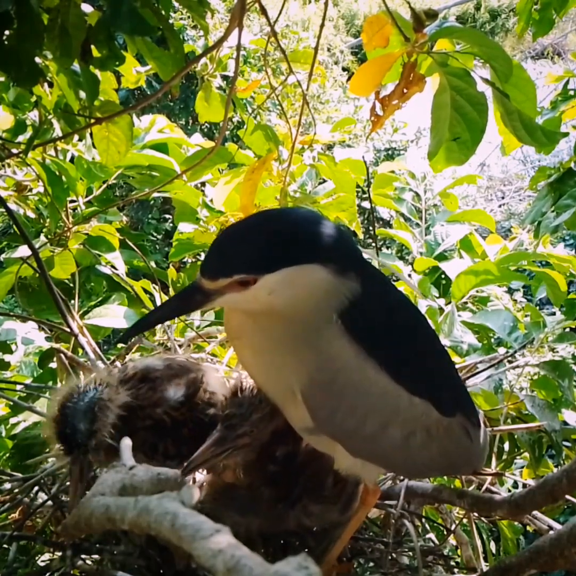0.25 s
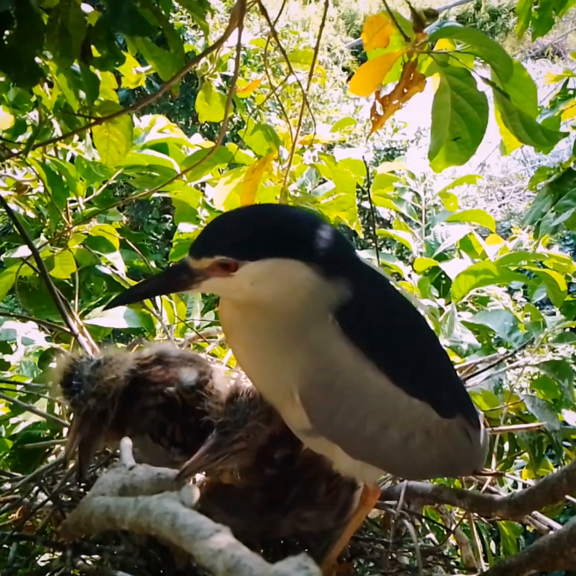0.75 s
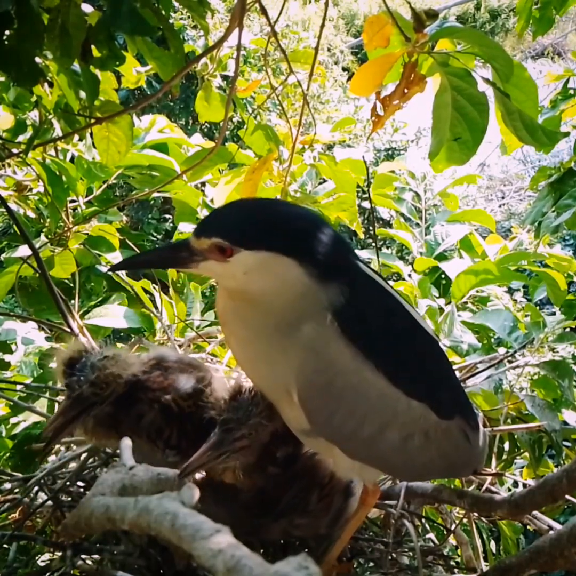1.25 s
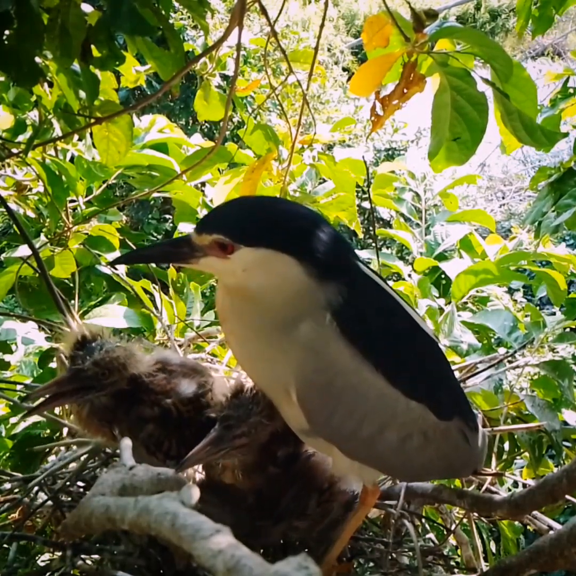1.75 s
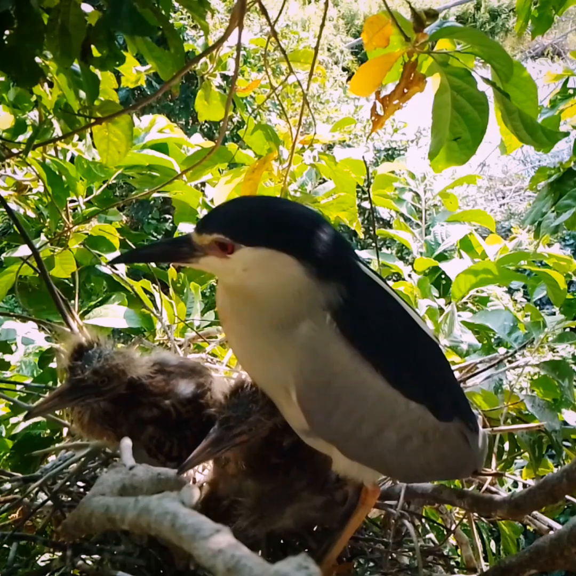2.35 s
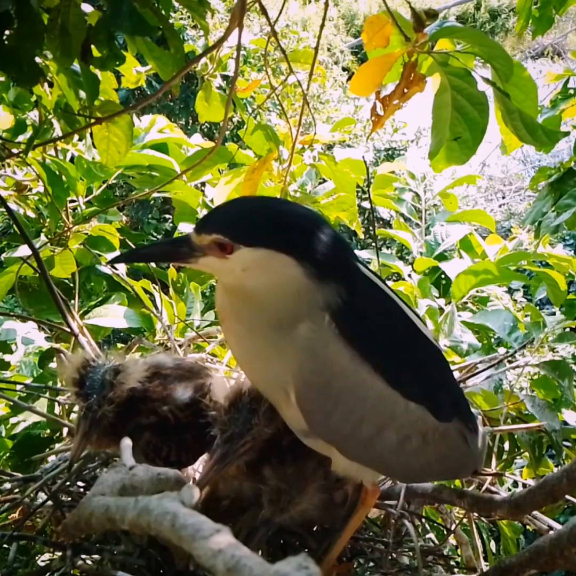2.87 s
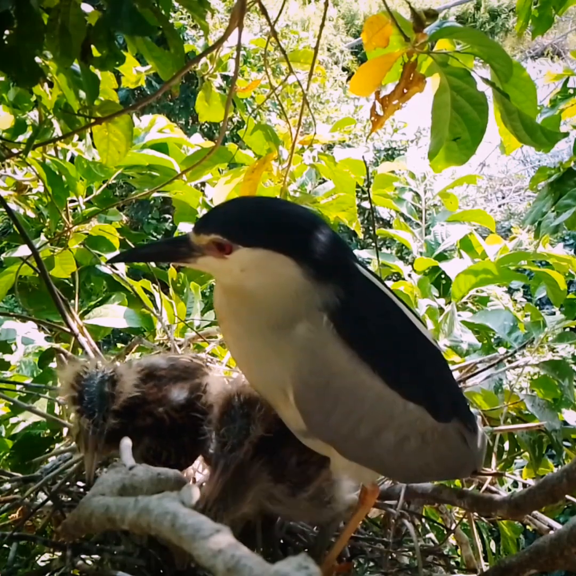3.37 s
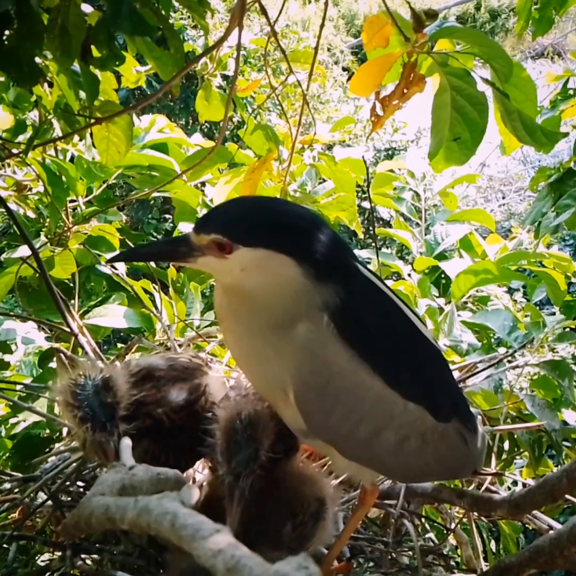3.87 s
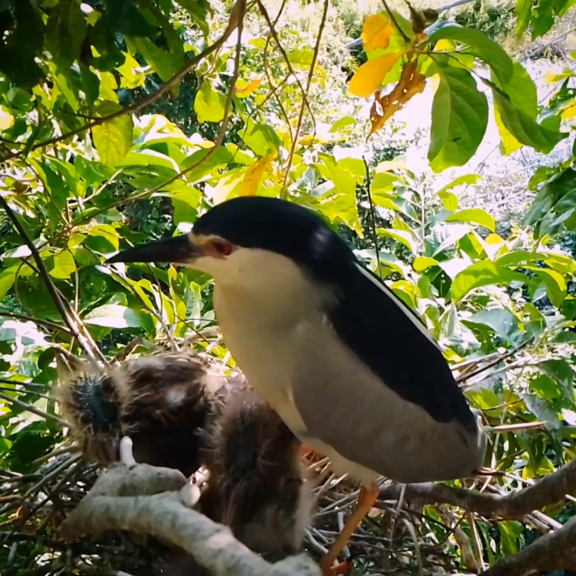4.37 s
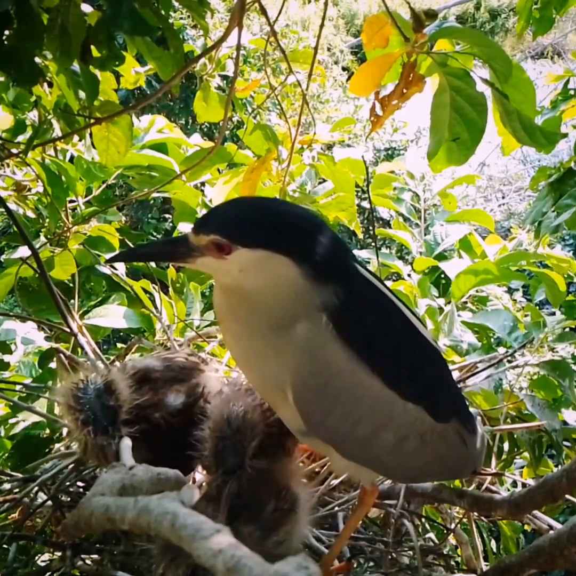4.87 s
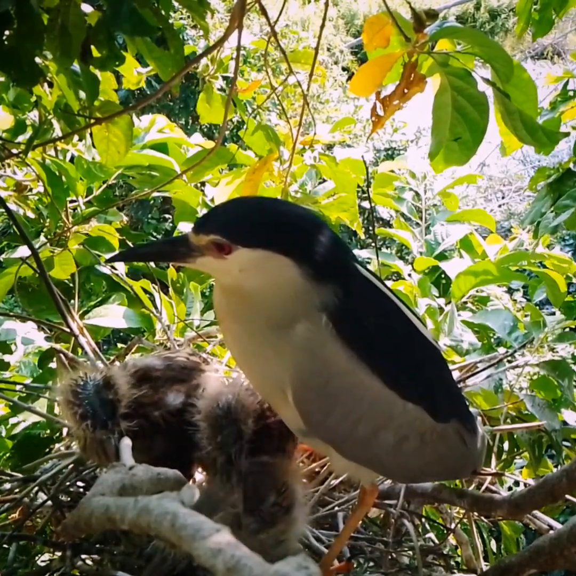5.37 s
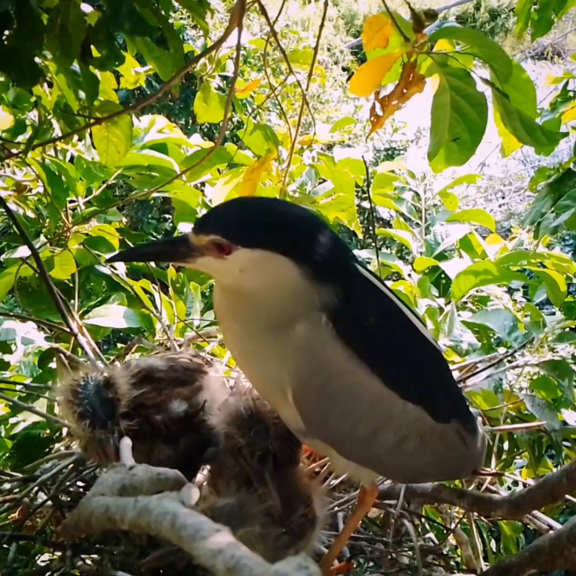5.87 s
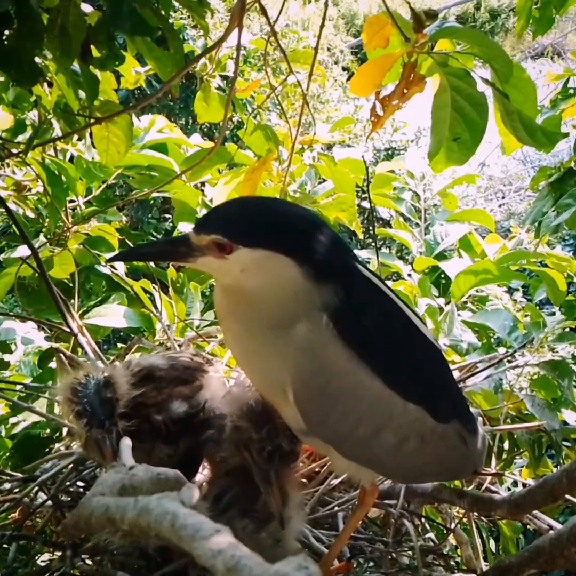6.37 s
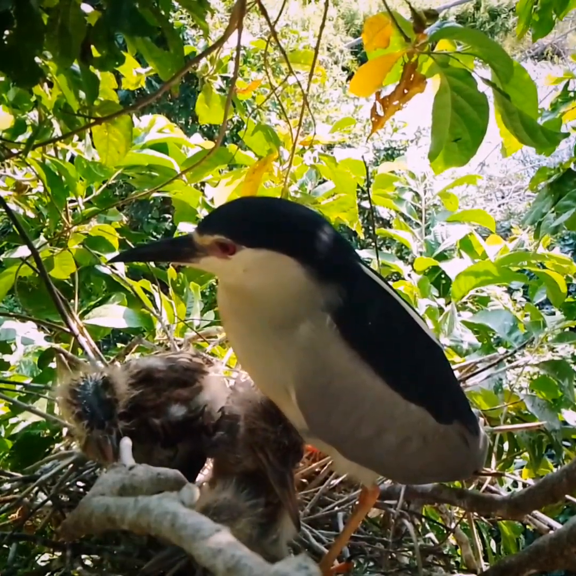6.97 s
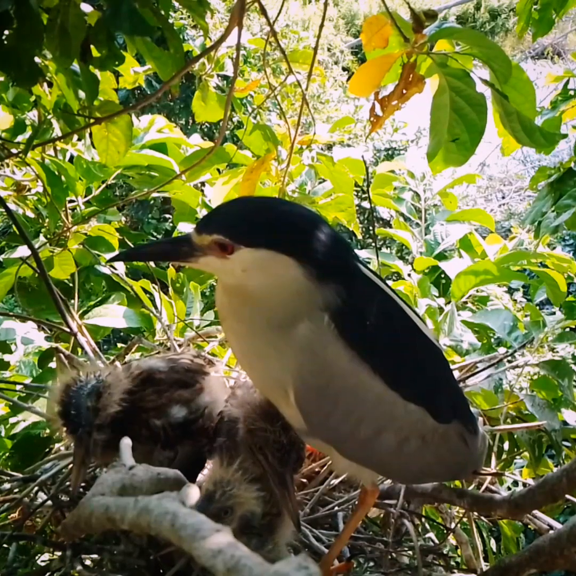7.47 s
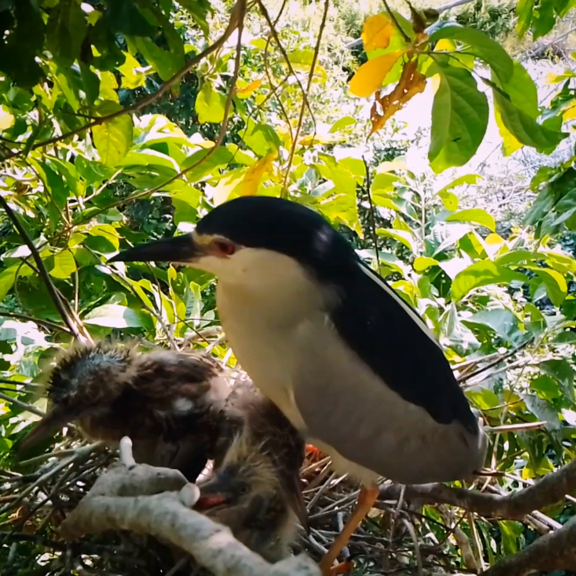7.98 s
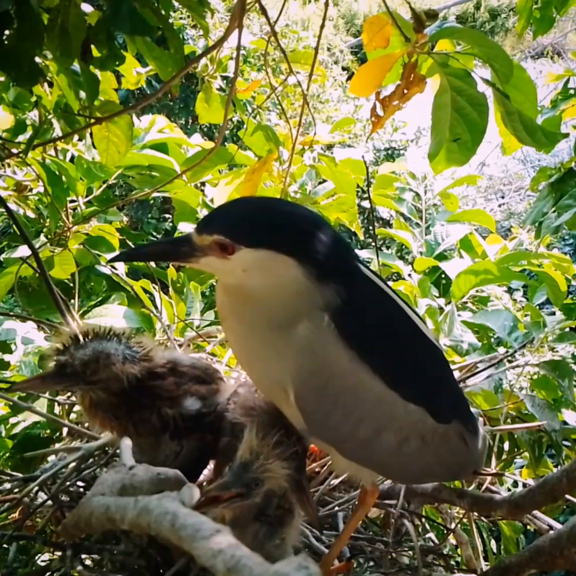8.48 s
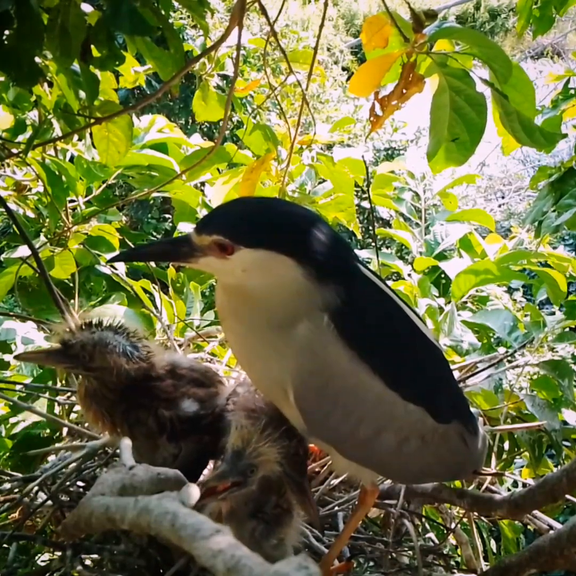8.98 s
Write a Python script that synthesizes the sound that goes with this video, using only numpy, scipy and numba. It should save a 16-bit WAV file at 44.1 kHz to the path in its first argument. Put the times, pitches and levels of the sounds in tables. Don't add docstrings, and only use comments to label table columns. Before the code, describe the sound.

Young nestlings beg in a tree. Distant ticks and a quiet croak lead to a near chick's dry, buzzy clicks, uneven at first, then regular at four or so a second. Another chick gives hoarse, breathy squawks that open up and fall; a third squeaks and cracks. A sharp twig snap, short honks and faint moans pass behind. Small spaced stereo microphones sit close, with soft hiss and leafy scatter but little echo.

```python
import sys
import numpy as np
from scipy import signal
from scipy.fft import rfft, irfft, next_fast_len
from scipy.io import wavfile
from scipy.ndimage import uniform_filter1d
from numba import njit

SR = 44100
rng = np.random.default_rng(int(sys.argv[2]) if len(sys.argv) > 2 else 0)


def attenuation_scalar(level_db):
    decades = np.asarray(level_db, float) / 20
    return 10 ** decades


def waveform_to_disk(signal):
    frames = np.transpose(np.atleast_2d(signal))
    scaled = np.clip(frames, -1, 1) * 32767
    samples = np.round(scaled).astype(np.int16)
    wavfile.write(sys.argv[1], SR, samples)


N = 407043


def rms_one(x):
    return x / np.sqrt(np.mean(x ** 2) + 1e-20)


def in_time(rows, t):
    s, *columns = np.transpose(rows)
    return [np.interp(t, s, column) for column in columns]


def at_hz(points, hz):
    points_hz, points_db = np.transpose(points)
    return np.interp(np.log(np.maximum(hz, 1)), np.log(points_hz), points_db)


def colour(x, points):
    size = next_fast_len(x.shape[-1])
    gain = attenuation_scalar(at_hz(points, np.fft.rfftfreq(size, 1 / SR)))
    return irfft(rfft(x, size) * gain, size)[..., :x.shape[-1]]


def wobble(rate_hz, size):
    r = np.exp(-2 * np.pi * rate_hz / SR)
    noise = rng.standard_normal(size + 8000)
    return rms_one(signal.lfilter([1], [1, -2 * r, r * r], noise)[8000:])


@njit
def moving_ring(x, hz, r, step):
    y = np.zeros(len(x))
    for i in range(2, len(x)):
        drive = (1 - r[i] ** 2) / 2 * (x[i] - x[i - 2])
        y[i] = drive + 2 * r[i] * np.cos(step * hz[i]) * y[i - 1] - r[i] ** 2 * y[i - 2]
    return y


def ring(x, hz, width_hz):
    flat = np.zeros(len(x))
    return moving_ring(x, hz + flat, np.exp(-np.pi * width_hz / SR) + flat, 2 * np.pi / SR)


def add(out, s, sound):
    i = max(round(s * SR), 0)
    out[i:i + len(sound)] += sound[:N - i]


def patchy(x, patchy_db, rate_hz):
    edges_hz = [60, 700, 1200, 1900, 2600, 3400, 4400, 5600, 7000, 8800, 11000, 16000]
    out = 0
    for band in zip(edges_hz, edges_hz[1:]):
        sos = signal.butter(2, band, "band", fs=SR, output="sos")
        out = out + attenuation_scalar(patchy_db * wobble(rate_hz, N)) * signal.sosfilt(sos, x)
    return out


def tick_rows():
    # start_s, level_db, pitch_hz, length_ms, throat_db
    hoarse = [
        (1.043, -48, 875, 33, -4),
        (1.329, -41.5, 670, 24.5, 2.5),
        (1.616, -40, 817, 34, -4),
        (2.206, -44.5, 714, 20, 19),
        (2.59, -37.5, 888, 35, 16),
        (2.901, -40.5, 659, 45, 2),
        (3.407, -49.5, 633, 34, -33),
        (3.624, -35, 784, 12.6, -11),
        (3.97, -39.5, 846, 27, 11),
    ]
    # start_s, level_db, pitch_hz, length_ms, throat_db
    eager = [(4.277, -46.5, 698, 40, -6), (4.507, -39, 772, 29.2, 8.5), (4.716, -40.5, 808, 41, -0.5),
             (5.018, -38.5, 712, 38, 11.5), (5.244, -33, 772, 28, 0.5), (5.445, -31.5, 815.6, 25, 6),
             (6.154, -32, 789, 14.6, -4), (6.386, -31, 709.7, 37.3, -1), (6.609, -29, 802, 29, 6),
             (6.833, -32, 812, 30.3, 0.5), (7.058, -33.5, 791, 32.5, -1.5), (7.284, -34.5, 802, 38.4, 7.5),
             (7.856, -36.5, 811, 29, 3), (8.094, -37, 695, 39, -2), (8.32, -31, 747, 29.7, 20),
             (8.532, -31, 805, 31.4, 7.5), (8.758, -33.5, 794, 38, 7), (8.96, -33, 740, 38, 12)]
    # start_s, level_db, pitch_hz, throat_db
    faint = [(0.0, -51.5, 707, -5), (0.09, -59.5, 744, -10.5), (0.283, -68, 734, 3), (0.494, -64.5, 687, 8),
             (0.753, -51, 816, 8), (0.959, -63, 808, 6), (1.182, -60, 683, 24), (1.404, -55.5, 760, -4),
             (1.724, -49.5, 702, 32), (1.848, -61, 760, 14), (2.014, -67.5, 716, 37), (2.061, -63, 850, 20),
             (2.251, -58, 715, 27), (2.297, -60.5, 740, 30), (2.352, -73, 750, 32.5), (2.404, -61.5, 724, 45),
             (2.486, -59.5, 800, 4), (2.648, -56.5, 577, -13), (2.723, -56, 571.5, 8), (2.779, -61, 713, 15),
             (3.1, -53.5, 745, 12), (3.2, -63, 732, 14), (3.741, -56, 934, 0), (4.13, -54.5, 744, 9.5),
             (4.315, -51, 737, 22), (4.361, -55, 702, 21), (4.929, -66, 780, 26), (5.65, -76, 748, 5),
             (5.375, -47.5, 857, 14), (7.02, -67, 767, -4), (7.516, -57.5, 773, 3),
             (8.452, -57.5, 780, -17.5), (8.686, -53.5, 715, 29), (9.169, -67, 754, 26)]
    faint = [(s, db, hz, 32.49, throat) for s, db, hz, throat in faint]
    rows = []
    for rough, table in [(.8, hoarse), (.5, eager), (.85, faint)]:
        for s, db, hz, ms, throat in table:
            rows.append((s, db, hz, rough + .08 * rng.standard_normal(), ms, throat))
    return rows


def ticks():
    # freq_hz, level_db
    tick_colour = [(600, -18), (950, -25.5), (1800, -17), (2290, -6), (3000, 4), (3830, 1.5), (4750, -1.5),
                   (5600, 3), (8000, 5.5), (9500, -10.5), (11200, 2.5), (12500, -24), (14000, -64)]
    attack_ms, order_count = 11, 16
    out, puffs = np.zeros((2, N)), np.zeros(N)
    t = np.arange(int(.12 * SR)) / SR
    t_ms = t * 1000
    order = np.arange(1, order_count + 1)[:, None]
    rows = tick_rows()
    breath = colour(rng.standard_normal((len(rows), 2, len(t))), tick_colour)
    luck = rng.standard_normal((len(rows), 4, order_count, 1))
    for (s, level_db, pitch_hz, rough, ms, throat_db), noise, (loud, phase, pan, turn) in zip(rows, breath, luck):
        age = t_ms / ms
        bend = 1.008 - .07 * np.minimum(age, 1.1) ** 3 - .025 * np.exp(-12 * age)
        glide_hz = pitch_hz * (bend + .006 * wobble(150, len(t)))
        throat = throat_db * np.exp(-((order * pitch_hz - 3100) / 550) ** 2)
        late_db = 1.1 * np.maximum(order - 4, 0) * np.clip(1 - 2.5 * age, 0, 1)
        breakup_db = 9 * (order > 5) * np.clip(2 * age - .9, 0, 1)
        partials_db = at_hz(tick_colour, order * pitch_hz) + throat + 2.6 * loud - late_db - breakup_db
        slow = signal.lfilter([1], [1, -1.96, .9604], rng.standard_normal((order_count, len(t))))
        flutter = 1 + .35 * rms_one(slow)
        angle = order * 2 * np.pi * np.cumsum(glide_hz) / SR + .5 * phase
        share = np.clip(rough ** 2 * .7 + rough * np.maximum(age - .25, 0) ** 1.5, 0, .85)
        shape = np.minimum(t_ms / attack_ms, 1) ** 0.59 * np.exp(-np.maximum(t_ms - ms, 0) / 10)
        sag_db = 1.88 * np.minimum(age, 1) ** 2
        shape = shape * attenuation_scalar(level_db + 1.0 - sag_db + 0.44 * wobble(66, len(t)))
        for ear, side in enumerate([1, -1]):
            partials = attenuation_scalar(partials_db + side * pan) * np.sin(angle + side * turn * 0.23 * order)
            tone = rms_one(np.sum(flutter * partials, axis=0))
            mixed = np.sqrt(1 - share) * tone + np.sqrt(share) * rms_one(noise[ear])
            add(out[ear], s - .006, shape * mixed)
        add(puffs, s, shape * (rms_one(noise[0]) + .7 * tone))
    return out, puffs


def calling(rows, t, swell_db, shut_hz, opening, breath_db, breath_lag_db, fall_db_per_s):
    onset_db_per_s, closing_hz_per_s = 1800, 160
    breath_per_db = 0.55
    peak_s, swell_s, peak_db, open_hz = np.transpose(rows)[:, :, None]
    ahead = np.clip((peak_s - t) / swell_s, 0, 1)
    after_s = np.maximum(t - peak_s, 0)
    before_s = np.maximum(peak_s - swell_s - t, 0)
    level_db = peak_db - swell_db * ahead - fall_db_per_s * after_s - onset_db_per_s * before_s
    mouth_hz = open_hz - opening * (open_hz - shut_hz) * ahead ** 2 - closing_hz_per_s * after_s
    hiss_db = breath_db + breath_per_db * (peak_db + 43.5) - breath_lag_db * ahead
    return np.stack([level_db, np.maximum(mouth_hz, 700), hiss_db], axis=1)


def squawk_controls(t):
    # peak_s, swell_s, peak_db, open_mouth_hz
    opening_calls = [(3.437, 0.045, -56, 1440), (3.517, 0.048, -55.5, 1240), (3.612, 0.081, -52, 1823),
                     (3.791, 0.21, -65, 1330), (4.814, 0.136, -43, 1430), (5.143, 0.13, -38.5, 1430),
                     (5.473, 0.12, -36.5, 1530), (5.71, 0.1, -49.5, 1600), (5.88, 0.21, -38.5, 1540),
                     (5.83, 0.06, -39, 1600), (6.211, 0.12, -39.5, 1500), (6.33, 0.42, -43.5, 1550),
                     (6.55, 0.1, -37, 1660), (6.64, 0.063, -40, 1520), (6.97, 0.29, -39.5, 1600),
                     (7.335, 0.16, -39, 1600), (7.66, 0.097, -52, 1550), (8.156, 0.14, -42, 1490),
                     (8.6, 0.19, -46.5, 1400), (9.229, 0.16, -45, 1550)]
    # hold_end_s, hold_s, level_db, mouth_hz
    held_calls = [(0.1, 0.068, -73, 1100), (0.758, 0.035, -79, 1620), (1.05, 0.0514, -69, 1080),
                  (1.66, 0.099, -55.5, 1655), (2.3, 0.089, -64, 960), (2.7, 0.13, -60, 2080),
                  (4.036, 0.032, -81, 1600), (4.101, 0.042, -64.5, 1140), (4.39, 0.0096, -65.5, 1010),
                  (4.72, 0.071, -57, 960), (5.388, 0.021, -47, 1050), (5.775, 0.047, -47.5, 1000),
                  (5.97, 0.053, -47, 1540), (6.06, 0.013, -56, 1550), (6.715, 0.22, -48.5, 960),
                  (7.71, 0.084, -50, 1370), (7.78, 0.071, -56, 960), (7.852, 0.035, -58.5, 1200),
                  (8.39, 0.098, -60.5, 960), (8.72, 0.039, -69.5, 1100), (8.87, 0.035, -70, 1016),
                  (8.95, 0.05, -50.5, 1440), (9.05, 0.072, -52.5, 1200)]
    coarse = t[::64]
    squawk = calling(opening_calls, coarse, swell_db=18.5, shut_hz=1100, opening=0.9,
                     breath_db=3.5, breath_lag_db=7, fall_db_per_s=225)
    croak = calling(held_calls, coarse, swell_db=6, shut_hz=1100, opening=0.076,
                    breath_db=1.5, breath_lag_db=-10, fall_db_per_s=329)
    calls = np.concatenate([squawk, croak])
    loudest = np.take_along_axis(calls, calls[:, :1].argmax(axis=0)[None], axis=0)[0]
    return [np.interp(t, coarse, control) for control in uniform_filter1d(loudest, size=5)]


def squawks():
    # time_s, pulse_hz, roughness (0-1)
    folds = [(0, 531, .3), (1.5, 515.4, .12), (1.62, 561, .1), (1.72, 583.3, .45), (2.0, 499.6, .4),
             (3.36, 528.4, .2), (3.45, 500, .3), (3.6, 449.5, .5), (4.6, 499, .4), (5.0, 479.6, .6),
             (9.23, 478, .55)]
    # freq_hz, density_db
    hiss_colour = [(2000, -31), (2800, -4), (3700, -0.5), (4500, -2.5), (5800, -4.5), (7600, -1.5),
                   (9300, -16.5), (11200, -2.5), (12500, -26), (14300, -123)]
    windpipe_hz, windpipe_width_hz, windpipe_db = 537.0, 560, -19.5
    t = np.arange(N) / SR
    level_db, mouth_hz, hiss_db = squawk_controls(t)
    mouth_hz = mouth_hz * (1 + .07 * wobble(15, N))
    pulse_hz, rough = in_time(folds, t)
    rough = np.clip(rough, 0, 1)
    cycle = np.cumsum(pulse_hz * (1 + 0.27 * rough * wobble(120.4, N))) / SR
    pulses = np.diff(np.floor(cycle), prepend=0) * attenuation_scalar(2.0 * rough * wobble(300, N))
    gate = 0.053 + np.cos(np.pi * cycle) ** 2
    puffing = gate * rng.standard_normal(N)
    source = np.sqrt(1 - rough) * rms_one(pulses - pulses.mean()) + np.sqrt(rough) * puffing

    mouth_width_hz = 110 + 500 * rough
    once = ring(source, mouth_hz, mouth_width_hz)
    mouth = rms_one(ring(once, mouth_hz, mouth_width_hz)) + .5 * rms_one(once)
    mouth = mouth / np.sqrt(mouth_width_hz / mouth_width_hz.mean())
    windpipe = ring(ring(source, windpipe_hz, windpipe_width_hz), windpipe_hz, windpipe_width_hz)
    windpipe = attenuation_scalar(windpipe_db) * rms_one(windpipe)

    gusts = attenuation_scalar(1.0 * wobble(30, N) + 1.3 * wobble(200, N))
    jet = gate ** 1.6 * gusts * rng.standard_normal((2, N))
    for ratio, width_hz, gain in [(2.55, 600, 0.4), (3.73, 500, 0.155)]:
        jet = jet + gain * np.array([ring(ear, ratio * mouth_hz, width_hz) for ear in jet])
    hiss = rms_one(patchy(colour(jet, hiss_colour), .9, 14)) * attenuation_scalar(hiss_db)
    return attenuation_scalar(level_db + 2.0) * (mouth - windpipe), attenuation_scalar(level_db) * hiss


def squeaks():
    # time_s, pitch_hz, level_db
    tracks = [
        [(0.54, 2263, -54), (0.553, 2200, -55), (0.563, 2446, -48.5), (0.581, 2388, -46), (0.596, 2250, -51),
         (0.605, 2166, -49.5)],
        [(2.93, 2585, -37.5), (2.956, 2510, -35), (2.968, 2580, -34.5)],
        [(3.447, 3400, -59), (3.477, 3180, -41), (3.492, 3206, -36)],
        [(3.512, 3083, -35), (3.521, 2894, -46), (3.53, 2550, -40.5), (3.548, 2460, -51)],
        [(3.985, 2508, -56), (4.006, 2797, -58), (4.05, 2916, -52), (4.065, 2780, -46), (4.079, 2644, -42.5),
         (4.11, 2550, -66)],
        [(5.07, 2600, -54), (5.112, 2806, -45.5), (5.142, 2450, -48), (5.16, 2590, -53)],
        [(5.91, 2573, -36), (5.93, 2744, -37.5), (5.964, 2690, -35.5), (5.99, 2440, -44.5)],
    ]
    # first_db, second_db, third_db, third_pitch_lines_db
    balance = [(-17, 6.5, -9.5, -16), (-10, -16, 1.5, -29), (-5.5, -4, -28.5, -24), (-2, -23, -30, -30),
               (-2, 1.5, -10, -11), (1, -11.5, -4, -26), (-9, -24, -10, -25)]
    out = np.zeros(N)
    for rows, (*partials_db, third_db) in zip(tracks, balance):
        t = np.arange(rows[0][0] - .004, rows[-1][0] + 0.0057, 1 / SR)
        hz, level_db = in_time(rows, t)
        glide_hz = uniform_filter1d(hz, size=300) * (1 + .005 * wobble(200, len(t)))
        phase = 2 * np.pi * np.cumsum(glide_hz) / SR
        tone = 0
        for k, partial_db in enumerate(partials_db):
            gain = attenuation_scalar(level_db + partial_db + 9.5 - 2 * k + 1.1 * wobble(83, len(t)))
            tone = tone + gain * np.sin((k + 1) * phase)
        lines = sum((1 + .6 * wobble(70, len(t))) * np.sin(k * phase / 3) for k in [4, 5, 7, 8])
        tone = tone + attenuation_scalar(level_db + third_db) * lines
        tone = tone * (1 + 0.24 * wobble(750, len(t)))
        add(out, t[0], tone * signal.windows.tukey(len(t), .2))
    return out


def rasps():
    # time_s, pitch_hz, level_db
    tracks = [
        [(2.972, 3143, -34.5), (3.018, 3265, -30.5), (3.064, 3153, -35), (3.075, 2780, -42.5)],
        [(3.492, 3140, -50), (3.535, 3085, -44.5), (3.548, 2900, -45)],
        [(3.995, 2500, -57), (4.04, 2750, -55), (4.09, 2667, -60)],
    ]
    # chaos (0-2), quarter_pitch_lines_db, upper_noise_db
    breakup = [(0.29, -19, -10.5), (0.92, -49, 0.5), (1.0, -27, 0)]
    out = np.zeros(N)
    for rows, (chaos, quarter_db, upper_db) in zip(tracks, breakup):
        t = np.arange(rows[0][0] - .003, rows[-1][0] + 0.009, 1 / SR)
        hz, tone_db = in_time(rows, t)
        phase = 2 * np.pi * np.cumsum(hz * (1 + 0.036 * chaos * wobble(100.0, len(t)))) / SR
        quarters = [(1, 0.64), (2, 0.28), (3, 1.07), (5, 1.4)]
        lines = sum(weight * np.sin(k * phase / 4) for k, weight in quarters)
        tone = np.sin(phase) + attenuation_scalar(quarter_db) * lines
        tone = rms_one(tone * (1 + chaos * wobble(200, len(t))))
        noise = rng.standard_normal(len(t))
        upper = rms_one(ring(ring(ring(noise, 1.9 * hz, 1140), 2.6 * hz, 1660), 2.3 * hz, 1900))
        upper = upper + 0.22 * rms_one(ring(noise, 11100, 710))
        band = signal.butter(4, [1.95 * hz.mean(), 12000], "band", fs=SR, output="sos")
        upper = signal.sosfilt(band, upper)
        upper = upper + 0.5 * rms_one(ring(ring(noise, 0.79 * hz, 990), hz, 1030))
        rasp = attenuation_scalar(tone_db + 2.5) * tone + attenuation_scalar(tone_db + upper_db + 7.5) * upper
        add(out, t[0], rasp * signal.windows.tukey(len(t), .12))
    return out


def honks():
    # time_s, pitch_hz, level_db
    tracks = [
        [(1.565, 505, -63), (1.58, 512, -50), (1.605, 540, -40), (1.63, 563, -46), (1.645, 595, -45),
         (1.66, 560, -52), (1.675, 500, -49)],
        [(2.79, 267.5, -86), (2.86, 311.2, -70.5), (2.95, 301.3, -64.5)],
        [(3.395, 553.4, -64.5), (3.43, 514.7, -58), (3.475, 478.7, -75)],
        [(3.735, 339.5, -67), (3.78, 356, -53), (3.82, 336, -67)],
        [(6.19, 496.1, -60), (6.25, 513.3, -51.5), (6.34, 501, -67)],
        [(6.383, 496, -48), (6.405, 486, -40), (6.44, 451, -55.5)],
        [(6.73, 519.1, -61.5), (6.77, 557, -65), (6.83, 568.7, -72)],
        [(6.9, 582, -53.5), (6.95, 597.2, -39), (6.99, 590, -48.5)],
        [(7.009, 810, -48), (7.016, 750, -40.5), (7.025, 620, -56)],
        [(8.28, 591.2, -59), (8.31, 572, -54.5), (8.335, 535.7, -61)],
        [(8.98, 521, -55), (9.01, 563.8, -50.5), (9.05, 520.4, -52), (9.09, 499, -48.5)],
    ]
    # mouth_hz, mouth_width_hz, first_partial_db, husk (0-1)
    mouths = [(1620, 260, -20, 0.22), (1100, 327, -15, 1), (1550, 330, -10.5, 0.5), (1323, 210, -22, 0.66),
              (1600, 1000, -23, 0.26), (960, 260, -41, 0.5), (1200, 840, -32, 0.3), (1778, 180, -41, 0.4),
              (2500, 730, -29, 0.4), (1160, 360, -12, 0.4), (1080, 200, -41, 0.76)]
    out, order = np.zeros(N), np.arange(1, 8)[:, None]
    for rows, (mouth_hz, width_hz, first_db, husk) in zip(tracks, mouths):
        t = np.arange(rows[0][0] - .006, rows[-1][0] + 0.012, 1 / SR)
        hz, level_db = in_time(rows, t)
        glide_hz = uniform_filter1d(hz, size=400) * (1 + .009 * wobble(60, len(t)))
        phase = 2 * np.pi * np.cumsum(glide_hz) / SR
        gains = 1 / (1 + ((order * hz - mouth_hz) / width_hz) ** 2) + attenuation_scalar(first_db) * (order == 1)
        flutter = 1 + husk * np.array([wobble(118, len(t)) for _ in order])
        partials = np.sin(order * phase + 7 * rng.random(order.shape))
        tone = np.sum(gains * flutter * partials, axis=0)
        add(out, t[0], attenuation_scalar(level_db + 1.0) * tone * signal.windows.tukey(len(t), .25))
    return out


def moans():
    # time_s, pitch_hz, level_db
    tracks = [
        [(1.2, 604, -79), (1.3, 586, -77), (1.5, 524, -78), (1.7, 607, -68), (1.85, 586, -80),
         (1.95, 570, -79.5)],
        [(2.115, 696, -79), (2.14, 810, -79), (2.185, 450, -66.5)],
        [(3.4, 548, -72), (3.44, 450, -64.5), (3.475, 295, -67.5)],
        [(3.492, 1247, -50), (3.518, 1136, -51), (3.53, 875, -59), (3.556, 756, -61)],
        [(5.95, 1386, -68), (5.975, 990, -69), (5.995, 660, -53)],
        [(7.005, 876, -68), (7.03, 530, -62.5)],
        [(7.5, 570, -72), (7.63, 565, -77)],
        [(7.8, 817.3, -68), (7.93, 800, -65), (8.06, 770, -59.5)],
    ]
    out = np.zeros(N)
    for rows in tracks:
        t = np.arange(rows[0][0], rows[-1][0], 1 / SR)
        hz, level_db = in_time(rows, t)
        tone = np.sin(2 * np.pi * np.cumsum(hz * (1 + 0.046 * wobble(80.0, len(t)))) / SR)
        gain = attenuation_scalar(level_db + 4.0 * wobble(25.0, len(t)))
        add(out, t[0], gain * tone * signal.windows.tukey(len(t), .2))
    return out


def place(x, lag, near_db, bass_db=-10):
    t = np.arange(int(0.046 * SR)) / SR
    near = colour(rng.standard_normal((2, len(t))), [(500, bass_db), (5000, 0)]) * attenuation_scalar(-60 * t / .055)
    paths = attenuation_scalar(near_db) * rms_one(near) / np.sqrt(len(t))
    paths[[0, 1], [max(lag, 0), max(-lag, 0)]] += 1
    return signal.oaconvolve(np.atleast_2d(x), paths, axes=1)[:, :N]


def restless(x, lag, near_db):
    turn_s, count = .45, 4
    turn = (np.arange(N) / SR / turn_s - np.arange(count)[:, None]) % count
    weights = np.sin(np.pi * turn / 2) ** 2 * (turn < 2)
    return sum(place(x * weight, lag, near_db, bass_db=-2) for weight in weights)


def leaves(x, level_db, t60_s=0.33):
    t = np.arange(int(.6 * SR)) / SR
    tail = colour(rng.standard_normal((2, len(t))), [(600, -8), (3000, 0), (9000, 0)])
    tail = tail * attenuation_scalar(-60 * t / t60_s) * np.minimum(t / .025, 1)
    paths = attenuation_scalar(level_db) * rms_one(tail) / np.sqrt(len(t))
    return signal.fftconvolve(x[None], paths, axes=1)[:, :N]


def snaps():
    # start_s, peak_db
    cracks = [
        (.492, -71),
        (3.345, -39.5),
    ]
    crack_colour = [(1500, -40), (7000, -10), (13000, 8.0), (15500, -38)]   # freq_hz, level_db
    out, t = np.zeros((2, N)), np.arange(int(0.031 * SR)) / SR
    for s, level_db in cracks:
        crack = colour(rng.standard_normal((2, len(t))) * attenuation_scalar(-60 * t / 0.021), crack_colour)
        for ear in range(2):
            add(out[ear], s, attenuation_scalar(level_db) * crack[ear])
    return out


def air():
    # freq_hz, density_db
    hiss_colour = [(120, -57), (200, -28.5), (307, -10.5), (630, 3.5), (1460, -0.5), (2640, 8),
                   (6360, -1.5), (7740, 7.5), (9260, -9), (11300, 0), (12600, -19), (14300, -11.5)]
    # freq_hz, density_db
    rumble_colour = [(15, 15.5), (40, -8.5), (90, -3.5), (125, -11), (200, -40)]
    hiss_db, rumble_db = -65.5, -79
    noise = rng.standard_normal((4, N))
    shared = colour(noise[2], [(200, 13.5), (700, -24.5)])
    breeze = noise[:2] * 0.56 + shared
    flutter = patchy(breeze, 1.8, 6) * attenuation_scalar(2 * wobble(4, N))
    hiss = rms_one(colour(flutter, hiss_colour))
    rumble = rms_one(colour(noise[3] + 0.29 * noise[:2], rumble_colour))
    return attenuation_scalar(hiss_db) * hiss + attenuation_scalar(rumble_db) * rumble


def scene():
    tick, puffs = ticks()
    voice, hiss = squawks()
    squeak = squeaks() + rasps()
    first = np.arange(N) < 2 * SR
    others = voice * first + moans() + honks()
    near = place(tick, 0, -8)
    near = near + restless(voice * ~first, -14, -9) + place(hiss, 0, 0) * attenuation_scalar(-3)
    near = near + place(squeak, 4, -10) + place(others, 5, -4, bass_db=-3)
    tails = leaves(puffs, -11.0) + leaves(voice + others, -19, .5) + leaves(squeak, -26)
    no_bass = signal.butter(4, 300, "high", fs=SR, output="sos")
    return signal.sosfilt(no_bass, near + tails) + snaps() + air()


def roll_off(x):
    return signal.sosfilt(signal.butter(12, 14280, fs=SR, output="sos"), x)


def record(dry):
    # freq_hz, left_minus_right_db
    port_mismatch = [(200, 0), (4000, 1.5), (5800, 6), (7200, 15), (7900, 18), (8600, 11), (9300, -4),
                     (10000, -18), (10700, -32), (11300, -20), (12000, -26), (13000, -8), (14000, 5)]
    size = next_fast_len(N)
    ratio = attenuation_scalar(at_hz(port_mismatch, np.fft.rfftfreq(size, 1 / SR)))
    ports = np.sqrt(2 / (1 + ratio ** 2)) * np.array([ratio, np.ones(len(ratio))])
    mix = irfft(rfft(dry, size) * ports, size)[:, :N]
    return roll_off(mix)


dry = scene()
out = record(dry)
waveform_to_disk(out)
```